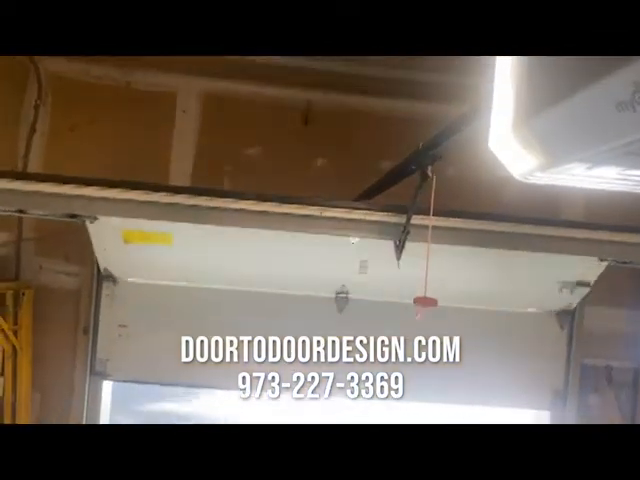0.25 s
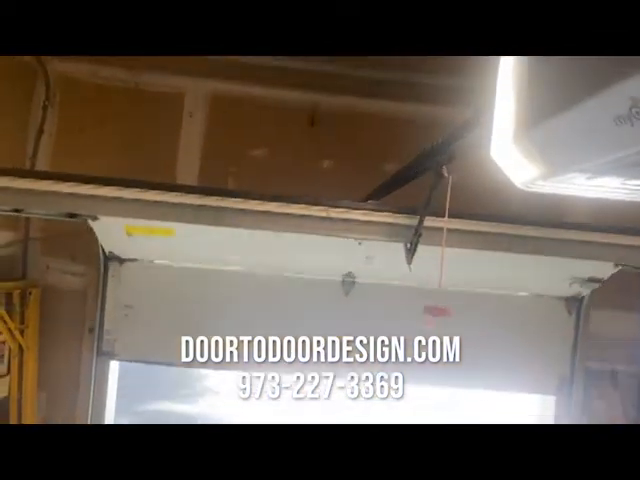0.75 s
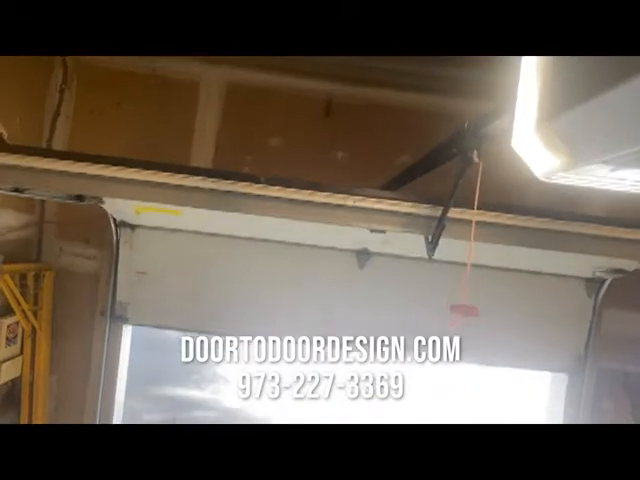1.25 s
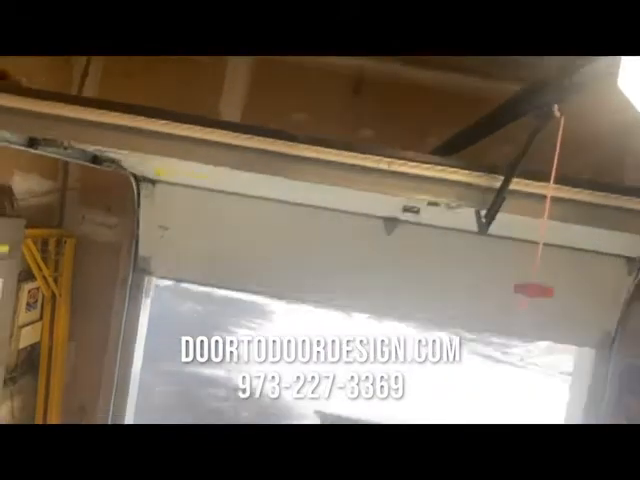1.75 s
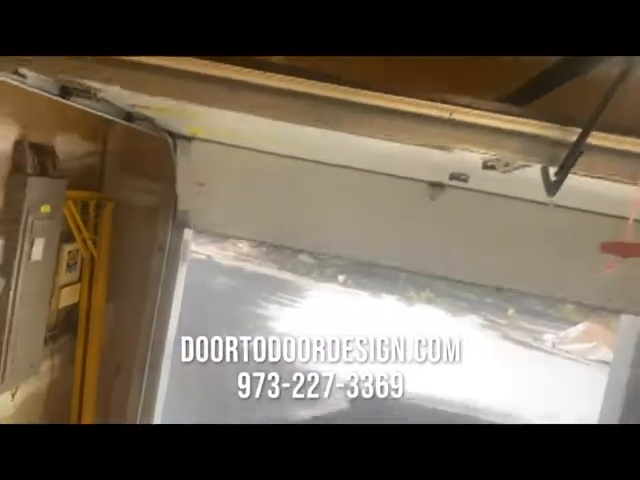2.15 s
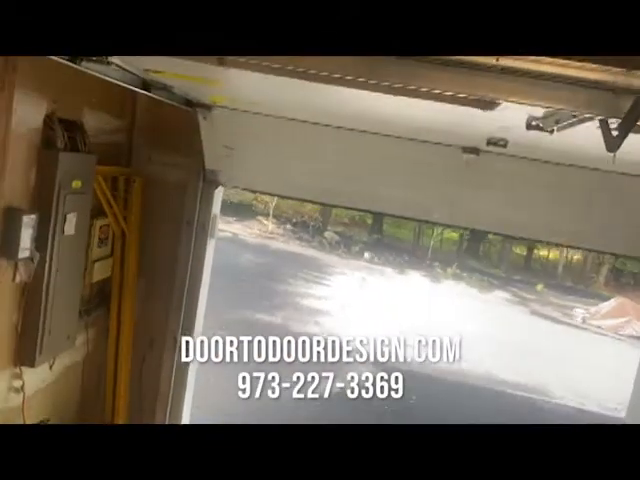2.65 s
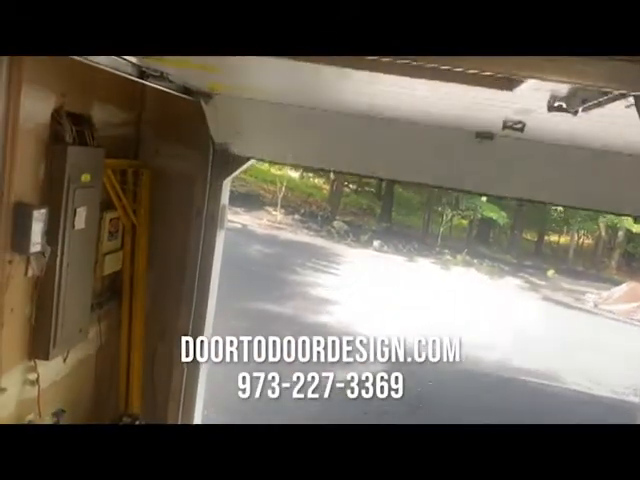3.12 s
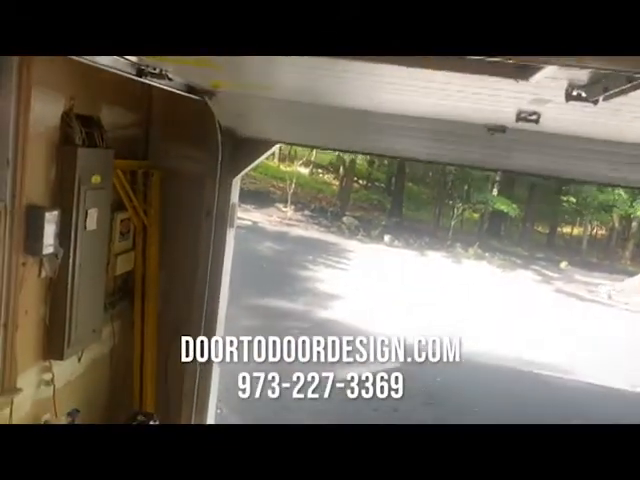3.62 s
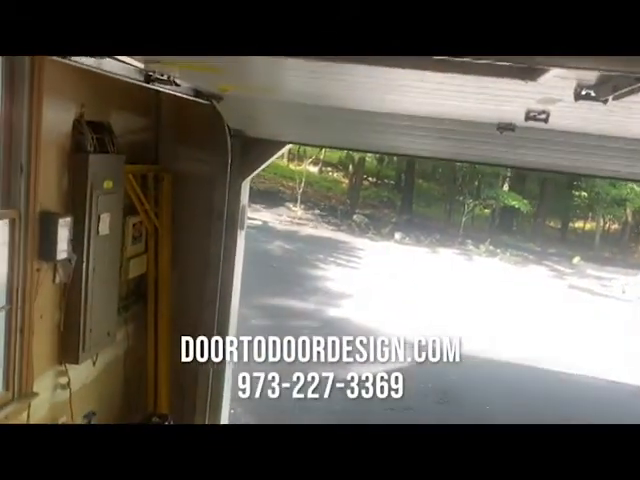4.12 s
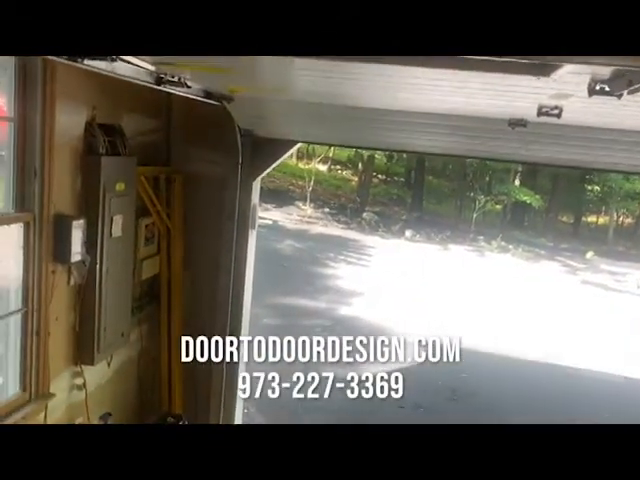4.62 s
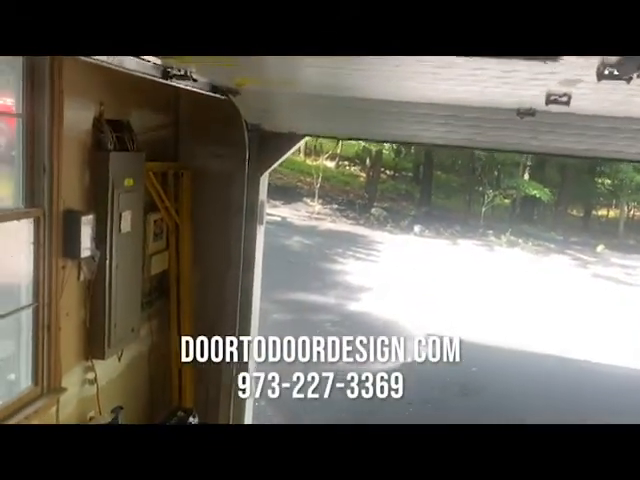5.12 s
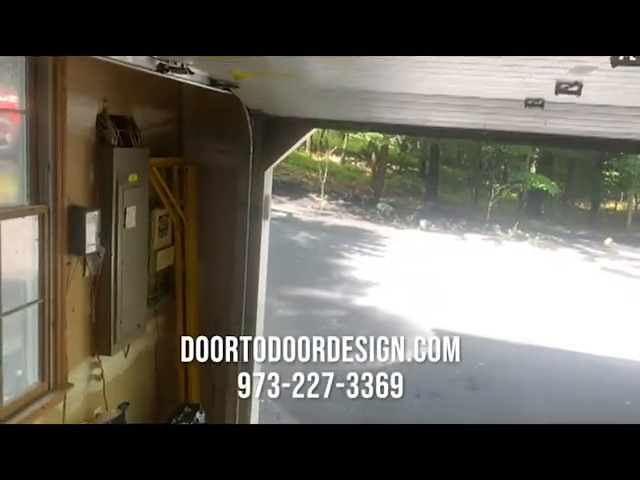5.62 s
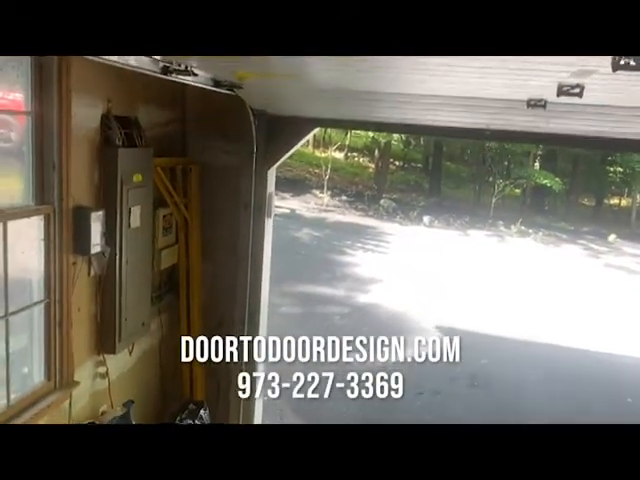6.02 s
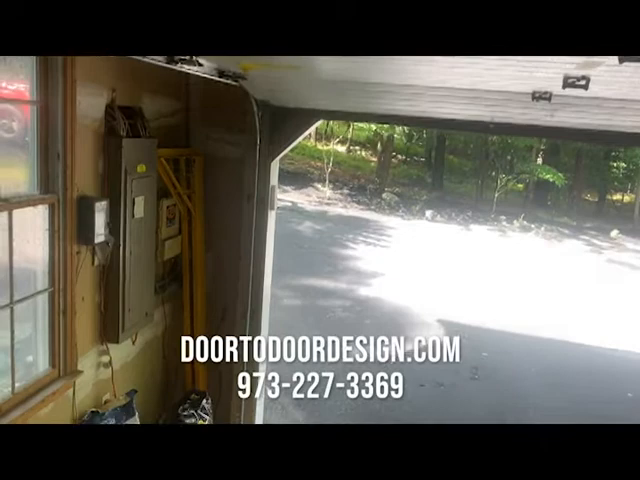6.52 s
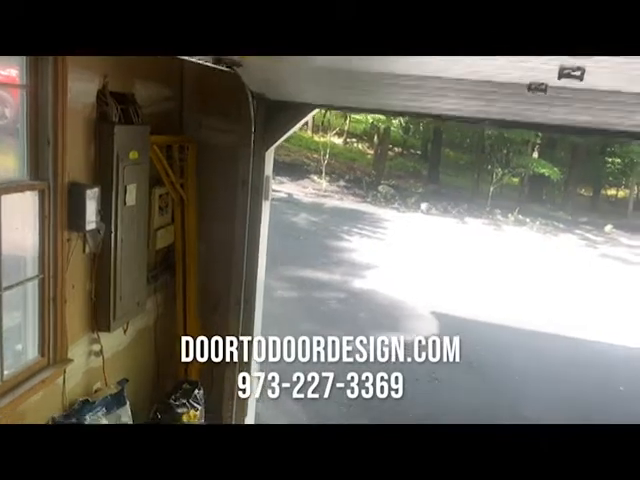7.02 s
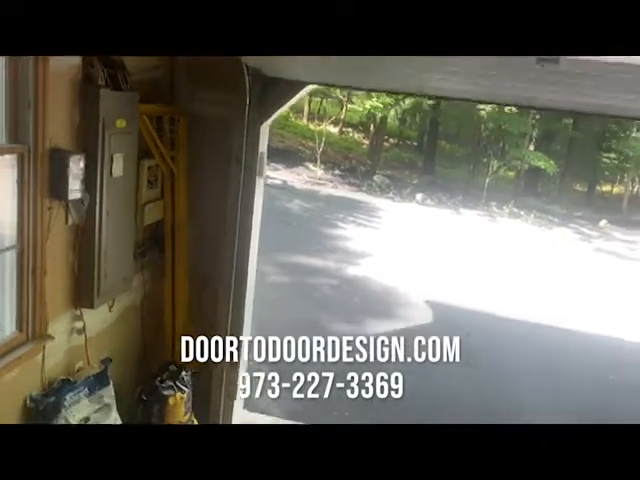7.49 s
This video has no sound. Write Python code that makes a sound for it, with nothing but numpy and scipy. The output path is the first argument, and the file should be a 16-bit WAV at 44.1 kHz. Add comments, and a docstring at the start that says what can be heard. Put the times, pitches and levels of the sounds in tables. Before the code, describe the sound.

Inside a reverberant garage, an electric opener drones and buzzes while its chain clacks, rollers rumble and sheet-metal panels rattle. After more than three seconds a relay clicks, the motor dies and the door knocks to rest. A quiet gap follows, then two separate clicks each set off much louder bangs, hollow knocks and low panel booms. Close, wide stereo pickup.

```python
"""An electric opener hauls a sectional door up in a garage: shaft-driven tones, mains hum and a pulsed buzz,
chain slaps, and noise for rumbling rollers, clattering sheet metal and rattling hinges.
The motor cuts out with a relay click and the door runs to a stop. Twice more a relay clicks and the sections
jerk, knock and bang against their steel hardware: noise bursts and decaying modes with a reverberant tail.
During the run and around the jerks the panels swell into booms of low resonant noise; quiet air lies under all."""
import sys
import numpy as np
from scipy import signal
from scipy.fft import rfft, irfft, next_fast_len
from scipy.io import wavfile
from scipy.ndimage import uniform_filter1d, map_coordinates

SR = 44100
rng = np.random.default_rng(int(sys.argv[2]) if len(sys.argv) > 2 else 0)


def int16_out(signal):
    """Quantize to a 16-bit WAV file."""
    q = np.round(np.clip(np.atleast_2d(signal).T, -1, 1) * 32767)
    wavfile.write(sys.argv[1], SR, q.astype(np.int16))


N = 341775

MOTOR_OFF_S = 3.37
SHAFT_HZ, MAINS_HZ = 29.25, 60
# load on the drive, the reference for its drone and the rollers' rumble: [time_s, level_db]
LOAD = [(0.0, -35), (0.12, -35), (2.46, -37), (2.64, -32), (2.69, -36.5), (3.11, -33), (3.32, -33.5)]


def amp(db):
    """Decibels to a linear factor."""
    return 10 ** (np.asarray(db) / 20)


def unit(x):
    """Scale to an rms of 1 over all channels."""
    return x / np.sqrt(np.mean(x ** 2) + 1e-20)


def clock(size=N):
    """Time of each sample in seconds."""
    return np.arange(size) / SR


def along(points, hz):
    """Interpolate (Hz, value) points on a log frequency axis."""
    f, v = np.transpose(points)
    return np.interp(np.log(hz + 1), np.log(f + 1), v)


def curves(rows):
    """One value per sample for each column after the time."""
    s, *cols = np.transpose(rows)
    return [np.interp(clock(), s, c) for c in cols]


def wobble(rate):
    """A smooth random curve with rate knots a second."""
    knots = rng.standard_normal(int(N * rate / SR) + 4)
    return map_coordinates(knots, [clock() * rate])


def filtered(x, response):
    """Shape the spectrum of x by a response of frequency."""
    n = x.shape[-1]
    m = next_fast_len(n + 8192)
    return irfft(rfft(x, m) * response(np.fft.rfftfreq(m, 1 / SR)), m)[..., :n]


def spread(hz):
    """Angle between mid (0) and side (pi / 2); in the treble the channels swing in and out of phase."""
    # side level against mid, before the treble swing: [pitch_hz, side_minus_mid_db]
    side_balance = [(60, -26.5), (110, -14), (200, -13), (380, -4), (700, -2.5), (1300, 1.5), (2400, -0.5),
                    (4400, -3.5), (8000, -1)]
    swing = np.cos(2 * np.pi * (hz - 7050) / 4140) * np.interp(hz, [5000, 9000], [0, 1])
    return np.arctan(amp(along(side_balance, hz))) - 0.83 * swing


def diffuse(response, size=N):
    """Stereo noise of rms 1, its width set band by band."""
    def mid_side(hz):
        angle = spread(hz)
        return response(hz) * np.array([np.cos(angle), np.sin(angle)])

    mid, side = filtered(rng.standard_normal((2, size)), mid_side)
    return unit(np.array([mid + side, mid - side]))


def noise(colour, size=N):
    """Diffuse noise with a (Hz, dB) colour."""
    return diffuse(lambda hz: amp(along(colour, hz)), size)


def sheet_noise(colour, lift, ripple_db, size=N):
    """Noise ringing in thin steel: a few strong resonances among many small ones."""
    # resonances of sheet steel and track, scaled by lift: [centre_hz, width_hz, full_lift_db]
    sheet = [(844, 61, 7), (965, 14, 4), (1059, 76, 2), (1480, 23, 4.5), (2500, 110, 0.5), (2690, 37, 9),
             (3270, 180, 3.5), (3630, 31, 1), (4320, 180, -3)]

    def response(hz):
        strong = sum(db / (1 + (2 * (hz - c) / w) ** 2) for c, w, db in sheet)
        small = map_coordinates(rng.standard_normal(SR // 8), [hz / 55], mode="nearest")
        small = small * hz / (hz + 600)  # the ripple grows towards the treble
        return amp(along(colour, hz) + lift * strong + ripple_db * small)

    return diffuse(response, size)


def tone(phase, hz):
    """A stereo sine of rms 1; the two channels are set apart in phase."""
    apart = spread(hz) * rng.choice([-1, 1])
    start = rng.uniform(0, 2 * np.pi)
    return np.sqrt(2) * np.sin(phase + start + np.array([[apart], [-apart]]))


def ring(modes, centre_hz, octaves, loose, detune):
    """Modes near centre_hz ring out, a little retuned each time; loose joints make their phases wander."""
    t = clock(SR // 2)
    out = np.zeros((2, len(t)))
    for hz, db, t60 in modes:
        reach = 1 / (1 + (np.log2(hz / centre_hz) / octaves) ** 2)
        tuned_hz = hz * (1 + detune * rng.normal())
        wander = loose * np.cumsum(rng.standard_normal(len(t))) / np.sqrt(SR)
        level = reach * amp(db + rng.normal(0, 0.86))
        decay = np.exp(-np.log(1000) * t / t60)
        out += level * decay * tone(2 * np.pi * tuned_hz * t + wander, hz)
    return out


def burst(colour, t60, room_db, attack, snap=0):
    """A short contact in steel and the garage's answer, which dies at its own rate in each band."""
    # reverberation of the garage: [pitch_hz, t60_s]
    garage = [(100, 0.73), (500, 1.22), (2000, 0.93), (4000, 0.88), (8000, 0.5), (15000, 0.5)]
    t = clock(SR)
    ringing = sheet_noise(colour, lift=0.43, ripple_db=5.0, size=SR)
    hz, frames, z = signal.stft(ringing[:, ::-1], SR, nperseg=256)
    fade = amp(-60 * frames / along(garage, hz)[:, None])
    tail = signal.istft(z * fade, SR, nperseg=256)[1][:, :SR]
    direct = ringing * np.exp(-np.log(1000) * t / t60) * (1 - np.exp(-t / attack))
    first_touch = 1 + snap * np.exp(-t / 0.00088)  # steel on steel starts with a hard crack
    return direct * first_touch + amp(room_db) * tail * (1 - np.exp(-t / 0.011))


def sharpen(x, db):
    """Lift the top octave for harder contacts, or lower it for softer ones."""
    return filtered(x, lambda hz: amp(db / (1 + (8500 / (hz + 1)) ** 8)))


def shifting(x, patchy_db):
    """Loose parts shift, so their resonances swell and break off in patches of time and pitch."""
    patch_hz, patch_s = 330, 0.035
    hz, t, z = signal.stft(x, SR, nperseg=512)
    where = np.meshgrid(hz / patch_hz, t / patch_s, indexing="ij")
    field = map_coordinates(rng.standard_normal((128, 512)), where, order=3, mode="wrap")
    return unit(signal.istft(z * amp(patchy_db * field), SR, nperseg=512)[1][:, :x.shape[1]])


def chatter(rate, spread_db, life, share):
    """Envelope of many small random contacts over a steady reverberant wash."""
    hits = (rng.random(N) < rate / SR) * amp(spread_db * np.minimum(rng.exponential(size=N), 3))
    power = signal.lfilter([1], [1, -np.exp(-2 / (life * SR))], hits ** 2)
    share = np.clip(share, 0, 1)
    return uniform_filter1d(np.sqrt(1 - share + share * power / power.mean()), size=40)


def swell(s, rise_s, hold_s, fall_db_per_s):
    """Attack from s seconds on, hold, then a steady fall in dB."""
    t = clock() - s
    return np.clip(t / rise_s, 0, 1) * amp(-fall_db_per_s * np.maximum(t - rise_s - hold_s, 0))


def add(track, s, sound):
    """Mix a sound in at s seconds."""
    part = track[:, round(s * SR):][:, :sound.shape[1]]
    part += sound[:, :part.shape[1]]


def motor():
    """The motor: its field gives hum, whine and buzz; its shaft shakes the drive into a drone."""
    t = clock()
    since_off = np.maximum(t - MOTOR_OFF_S, 0)
    turns = SHAFT_HZ * t + 0.013 * wobble(3.09)  # the shaft runs a little unevenly
    since_peak = (t * 2 * MAINS_HZ) % 1 / (2 * MAINS_HZ)  # s, the field peaks twice per mains cycle
    drone = shaft_drone(turns)
    field = hum() + whine(turns) + buzz(since_peak) + sing(since_peak)
    return drone * np.exp(-since_off / 0.08) + field * np.exp(-since_off / 0.024)


def shaft_drone(turns):
    """The turning shaft shakes the drive at multiples of its speed, each line wavering by itself."""
    # drive vibration, levels relative to the drone: [shaft_multiple, start_db, halfway_db, motor_off_db]
    orders = [(2, -9.5, -14, -9), (5.997, -12.5, -9.5, -14), (7, -11.5, -9, -8.5), (9.11, -7.5, -9.5, -19),
              (9.97, -5, -5, -7.5), (11.93, -5.5, -6, -10), (12.9, -14, -17.5, -21),
              (14.1, -17, -13.5, -14.5), (16.05, -18, -16.5, -14.5), (20.28, -21, -26, -33),
              (21.75, -17, -22, -19), (23.04, -19, -16, -16), (25.25, -28, -18, -17),
              (28.14, -23, -20, -19), (31.75, -27, -20, -16.5), (36, -29, -12, -24),
              (36.7, -19, -15.5, -26), (39.1, -16, -25, -25), (40.1, -23, -22, -23)]
    # mean level of the drive's strongest line: [time_s, level_db]
    main_line = [(0, -47), (.14, -41.5), (.27, -48), (.5, -38.5), (.75, -42), (.95, -38), (1.14, -45.5),
                 (1.38, -37), (1.7, -52), (2.2, -51), (2.55, -46), (2.85, -38), (3.0, -50), (3.26, -50),
                 (3.36, -43)]
    main_order, drone_re_load_db = 11, -5.5
    load_db, = curves(LOAD)
    main_db, = curves(main_line)

    def line(k):
        phase = 2 * np.pi * k * turns + 0.34 * wobble(12)
        return amp(2.15 * wobble(5.0)) * tone(phase, k * SHAFT_HZ)

    drone = amp(main_db) * line(main_order)
    for k, *levels_db in orders:
        level_db = np.interp(clock(), [0, MOTOR_OFF_S / 2, MOTOR_OFF_S], levels_db)
        drone += amp(load_db + drone_re_load_db + level_db) * line(k)
    return drone


def hum():
    """The magnetic field hums on even mains harmonics."""
    # mean levels, around which each harmonic wavers: [pitch_hz, level_db]
    harmonics = [(120, -52.5), (240, -43), (1680, -65)]
    return sum(amp(db + wobble(3.5)) * tone(2 * np.pi * hz * clock(), hz) for hz, db in harmonics)


def whine(turns):
    """A magnetic whine; each turn of the rotor sways it and gives it sidebands."""
    # level before trim and waver: [time_s, level_db]
    whine_level = [(0.0, -73), (0.03, -57), (0.53, -56), (1.04, -62.5), (1.9, -59), (2.4, -51), (3.05, -51),
                   (3.33, -54)]
    whine_hz = 30 * MAINS_HZ
    level_db, = curves(whine_level)
    phase = 2 * np.pi * whine_hz * clock() + 0.25 * wobble(24.9)
    sway = 1 + 0.15 * np.sin(2 * np.pi * turns)
    return amp(level_db - 1.5 + 1.2 * wobble(14)) * tone(phase, whine_hz) * sway


def buzz(since_peak):
    """Bright noise pulses with each peak of the field and sinks as the door rises."""
    # colour of the buzz: [pitch_hz, level_db]
    buzz_colour = [(3000, 0), (6000, -6), (7600, -6), (9000, -0.5), (10500, -0.5), (11500, 2.5),
                   (11750, 1.5), (12050, 2), (13000, 3), (14000, -6), (15800, -9.5)]
    halfway_db, fade_db_per_s = -51.5, 2
    level_db = halfway_db - fade_db_per_s * (clock() - MOTOR_OFF_S / 2)
    pulses = unit(1 + 1.1 * np.exp(-since_peak / 0.0022))
    return amp(level_db) * sheet_noise(buzz_colour, lift=0, ripple_db=-0.5) * pulses


def sing(since_peak):
    """A thin high ring struck by each pulse of the buzz."""
    # pitch glide, and level at each strike: [time_s, pitch_hz, level_db]
    sing_path = [(0, 12040, -63), (1.1, 12500, -63), (1.6, 11800, -54), (2.0, 11860, -52.5),
                 (3.37, 11850, -55)]
    decay_s = 0.0038
    pitch_hz, level_db = curves(sing_path)
    phase = 2 * np.pi * np.cumsum(pitch_hz) / SR + 0.45 * wobble(120)
    return amp(level_db) * np.exp(-since_peak / decay_s) * tone(phase, pitch_hz.mean())


def chain():
    """While the motor pulls, links slap the rail: short uneven clacks, each with its own colour."""
    link_count, level_db, level_spread_db = 44, -47.5, 1
    middle_hz, reach_octaves = 1390, 0.61
    out = np.zeros((2, N))
    t = clock(SR // 8)
    fade = np.exp(-t / 0.0067) + 0.2 * np.exp(-t / 0.038)
    for k, (late, strength, pitch) in enumerate(rng.standard_normal((link_count, 3))):
        centre_hz = middle_hz * 2 ** (reach_octaves * np.tanh(pitch))
        clack = diffuse(lambda hz: hz / centre_hz / (1 + (hz / centre_hz) ** 4), len(t))
        slap_s = abs(k + 0.5 * late) * MOTOR_OFF_S / link_count
        add(out, slap_s, amp(level_db + level_spread_db * strength) * fade * clack)
    return out


def travelling():
    """1 while the door runs, dying away once it comes to rest."""
    stop_s, fall_db_per_s = 3.687, 96
    return amp(-fall_db_per_s * np.maximum(clock() - stop_s, 0))


def travel():
    """The door rolls up the track; small bumps swell clatter and rattle together."""
    # reference for hinge rattle and clatter: [time_s, level_db]
    looseness = [(0.0, -47), (0.16, -46), (0.57, -47.5), (0.71, -49.5), (1.07, -48), (1.32, -52),
                 (1.53, -49.5), (1.65, -49.5), (2.91, -48.5), (3.31, -47.5), (3.43, -48), (3.6, -51.5)]
    # colour of the rolling rumble: [pitch_hz, level_db_per_hz]
    rolling = [(70, -10.5), (100, -1), (150, -0.5), (220, 1.5), (290, -3), (340, -1), (420, -7.5),
               (600, -20.5), (1200, -65.5)]
    roll_re_load_db, clatter_re_loose_db, rattle_re_loose_db = -4, 5.5, 1
    clatter_follows = 0.67  # share of the rattle's swells that the sheet metal follows
    load_db, = curves(LOAD)
    loose_db, = curves(looseness)
    bumps_db = 0.61 * wobble(14)
    mean_db = loose_db.mean()
    clatter_db = clatter_re_loose_db + mean_db + clatter_follows * (loose_db - mean_db)
    rumbling = amp(load_db + roll_re_load_db)
    clattering = amp(clatter_db + bumps_db)
    rattling = amp(loose_db + rattle_re_loose_db + bumps_db)
    return travelling() * door(rumbling, clattering, rattling, rolling, lift=0.11, sharp_db=5.5)


def door(rumbling, clattering, rattling, colour, lift, sharp_db):
    """Rollers rumble, sheet metal clatters and loose hinges rattle, each under its own envelope."""
    # colours of sheet metal and hinges: [pitch_hz, level_db]
    clatter_colour = [(250, -40), (420, -5.5), (520, -3), (620, -0.5), (850, -2), (1100, -2), (1400, -6.5),
                      (1650, -11.5), (1900, -12), (2600, -37), (5000, -70)]
    rattle_colour = [(900, -4), (1700, 3.5), (2500, 2.5), (3500, -3.5), (4500, -5.5), (5600, -9),
                     (7600, -9.5), (9000, -13), (11000, -13.5), (14000, -17.5), (15800, -33)]
    rumble = noise(colour) * chatter(rate=64, spread_db=5.0, life=0.02, share=0.25)
    metal = shifting(sheet_noise(clatter_colour, lift, ripple_db=3.5), patchy_db=1.5)
    clatter = metal * chatter(rate=110, spread_db=6.5, life=0.021, share=0.54)
    hinges = shifting(sheet_noise(rattle_colour, lift, ripple_db=2.5), patchy_db=2)
    rattle = sharpen(hinges, sharp_db) * chatter(rate=130, spread_db=4.0, life=0.02, share=0.5)
    return rumbling * rumble + clattering * clatter + rattling * rattle


def scrapes():
    """A roller rubs its track for a moment and rasps in one band, catching and slipping."""
    # strokes, half-width as a share of the centre: [start_s, length_s, centre_hz, half_width, peak_db]
    strokes = [(0.13, 0.13, 950, 0.33, -41), (0.364, 0.13, 1590, .16, -41.5),
               (0.461, 0.19, 1470, 0.5, -39.5), (.47, 0.076, 3380, .15, -46), (1.02, 0.3, 2260, 0.029, -50),
               (1.485, .07, 3500, .12, -52.5), (1.57, .07, 3920, 0.19, -49.5),
               (1.67, 0.096, 3300, 0.51, -47.5), (1.855, .07, 2130, .05, -49),
               (1.865, 0.047, 4600, .08, -46), (2.09, 0.11, 1950, .07, -48), (2.202, 0.15, 2560, 0.04, -51),
               (3.0, 0.059, 1590, .1, -46), (5.152, 0.083, 855, 0.076, -32),
               (6.831, 0.13, 1020, 0.3, -36.5), (6.783, 0.14, 2450, 0.067, -40),
               (6.848, 0.13, 4470, .08, -44), (7.175, .04, 5500, .07, -42), (7.426, 0.064, 3000, 0.1, -43),
               (7.422, 0.11, 1020, 0.44, -36.5)]
    out = np.zeros((2, N))
    for s, length, centre_hz, width, db in strokes:
        stroke = np.hanning(round(length * SR))
        rasp = diffuse(lambda hz: 1 / (1 + ((hz - centre_hz) / (width * centre_hz)) ** 2), len(stroke))
        add(out, s, amp(db) * stroke * rasp)
    return out * chatter(rate=130, spread_db=1.5, life=0.01, share=0.38)


def groan():
    """A section bending round the curve of the track shudders at one low pitch, swelling and fading."""
    centre_s, width_s, peak_db, groan_hz = 2.63, 0.075, -34.5, 119
    bend = 1 / (1 + ((clock() - centre_s) / width_s) ** 4)
    return amp(peak_db) * bend * tone(2 * np.pi * groan_hz * clock() + 0.31 * wobble(19), groan_hz)


def jolts():
    """Each jolt shakes the whole door for a moment; the energy of overlapping jolts adds up."""
    # jolts: [start_s, hold_s, rumble_db, clatter_db, rattle_db]
    jolt_table = [(3.513, 0.066, -40, -41.5, -73), (3.647, 0.0091, -40, -40, -66),
                  (3.703, 0.0085, -39, -41.5, -55), (4.128, .01, -64, -76, -84),
                  (5.094, 0.05, -35.5, -33.5, -42), (5.158, 0.056, -30, -33, -39),
                  (5.34, 0.011, -27.5, -34, -38), (5.457, 0.024, -33, -41, -46),
                  (5.668, .02, -39, -50, -65), (5.885, .005, -44.5, -54.5, -70),
                  (6.08, 0.028, -47.5, -69, -77), (6.284, 0.13, -53, -74, -81), (6.771, 0.1, -30, -36, -39),
                  (6.988, 0.028, -29, -31, -37), (7.16, .02, -32, -37, -43), (7.417, 0.1, -35, -41, -45.5)]
    # fall of rumble, clatter and rattle in turn: [fall_db_per_s]
    falls = [63, 108, 66]
    # colour of the lurching rumble: [pitch_hz, level_db_per_hz]
    lurching = [(70, -19), (105, 3), (140, -2), (205, 1), (255, -5.5), (335, -0.5), (420, -9.5),
                (600, -15.5), (1200, -69.5)]
    rise_s = 0.029
    power = np.zeros((3, N))
    for s, hold_s, *levels_db in jolt_table:
        for part, (db, fall) in enumerate(zip(levels_db, falls)):
            power[part] += (amp(db) * swell(s, rise_s, hold_s, fall)) ** 2
    return door(*np.sqrt(power), lurching, lift=0.62, sharp_db=-7.5)


def knocks():
    """A section knocks against its neighbour: a short hollow swing, then a weaker ring."""
    # knocks, level before trim: [start_s, level_db, ring_centre_hz]
    knock_table = [(.148, -32, 338), (.225, -37.5, 950), (.538, -33, 1340), (1.877, -39, 1100),
                   (1.993, -40, 980), (2.417, -38, 650), (2.917, -47, 1100), (3.340, -31, 316),
                   (3.397, -33, 339), (3.545, -40, 1150), (3.560, -33, 200), (3.605, -35, 200),
                   (3.661, -30, 1000), (3.674, -32.5, 660), (3.684, -32, 340), (3.738, -36, 1030),
                   (3.742, -28.5, 270), (3.764, -28, 225), (3.772, -38, 700), (3.797, -33.5, 560),
                   (5.130, -26, 301), (5.174, -26, 900), (5.203, -26, 1060), (5.218, -28.5, 500),
                   (5.240, -27.5, 980), (5.258, -21.5, 175), (5.305, -31, 450), (5.388, -21.5, 320),
                   (5.402, -27.5, 450), (5.480, -31.5, 850), (5.503, -29, 450), (5.620, -37.5, 450),
                   (5.661, -38.5, 1035), (5.907, -44, 330), (6.552, -49.5, 281), (6.803, -29.5, 323),
                   (6.811, -24, 1000), (6.834, -23, 875), (6.864, -30, 1250), (6.880, -29.5, 760),
                   (6.918, -34, 1080), (6.990, -31, 820), (7.022, -23.5, 362), (7.028, -29.5, 1400),
                   (7.052, -30.5, 1050), (7.070, -31, 230), (7.132, -39, 158.7), (7.203, -27, 350),
                   (7.399, -33.5, 1050), (7.432, -32, 900), (7.491, -40, 280), (7.585, -39, 1500)]
    # modes of a door section, t60 of the late ring: [pitch_hz, level_db, t60_s]
    section = [(173, 0, 0.35), (226.6, 2, .4), (290.6, -1.5, 0.427), (337.2, 1, 0.46), (376.5, -2, 0.24),
               (462, -3, 0.68), (561, -7, .4), (657, -2.5, 0.66), (706, -7.5, .5), (838, 0, 0.45),
               (942, -1.5, 0.41), (1076, -1, 0.37), (1207, -9, 0.32), (1476, -1.5, .55), (1616, -2.5, 0.49)]
    rise_s, first_t60_s, late_db = 0.0027, 0.09, -10
    out = np.zeros((2, N))
    t = clock(SR // 2)
    fall = np.exp(-np.log(1000) * t / first_t60_s) + amp(late_db)
    shape = (1 - np.exp(-t / rise_s)) * fall
    for s, db, centre_hz in knock_table:
        hollow = ring(section, centre_hz, octaves=0.36, loose=6.5, detune=0.007)
        add(out, s, amp(db - 3.5) * shape * hollow)
    return out


def blows():
    """Rollers, hinges and arm clack and thud; where a blow lands decides which steel modes ring."""
    # blows, clack before trim: [start_s, clack_db, thud_db, ring_centre_hz, top_octave_lift_db]
    blow_table = [(.055, -49, -44, 3400, -1), (0.132, -38, -54, 7400, 8), (.215, -42, -34.5, 2630, -4),
                  (0.379, -41.5, -49, 4400, 9), (.483, -38.5, -28.5, 4320, 9), (.540, -44, -34, 2650, -2),
                  (.916, -43.5, -37, 4350, -2), (1.128, -46, -55, 7460, 16), (1.160, -44, -48, 2300, -1),
                  (1.52, -46, -42, 2630, -10), (1.879, -41, -49, 4600, -2), (1.996, -46, -38.5, 4400, -15),
                  (2.113, -42, -35, 2700, 5), (2.359, -43.5, -47, 7400, -9), (2.802, -41.5, -33, 2700, 0),
                  (3.030, -48, -41, 3400, -9), (3.229, -54, -47, 2600, -8), (3.55, -44, -44, 7400, 13),
                  (3.663, -40.5, -29, 7500, 16.5), (3.737, -43, -32, 7600, 11.5),
                  (5.079, -47, -47, 4500, -4), (5.110, -45, -34, 5600, 0), (5.121, -39, -43, 10600, 16),
                  (5.139, -43.5, -38, 10600, 19), (5.168, -35, -27, 10600, 20.5),
                  (5.200, -35, -27, 2560, 16), (5.238, -39.5, -33.5, 2580, 18),
                  (5.366, -33.5, -43, 6980, 9), (5.378, -24, -35, 7230, 9.5),
                  (5.478, -31.5, -32, 4070, -17), (5.662, -48, -35.5, 3440, -28),
                  (5.907, -59.5, -43, 2630, -13), (6.774, -36.5, -46, 7400, 3),
                  (6.793, -33, -40, 3400, -14), (6.801, -31.5, -33, 4400, -1), (6.811, -43, -36, 7400, 0),
                  (6.837, -38, -30, 7400, 7), (6.858, -29, -55, 7900, 3), (6.999, -39.5, -52, 6300, 7),
                  (7.015, -25, -39, 6600, 5), (7.186, -31.5, -35.5, 3710, -10),
                  (7.400, -56, -34, 2700, -12), (7.430, -36.5, -34.5, 3100, -1),
                  (7.465, -37, -42, 3700, -38), (7.627, -44.5, -37, 3490, -42)]
    # colours of clack and thud: [pitch_hz, level_db]
    clack_colour = [(300, 0.5), (1000, 10), (2000, -11), (3300, 3.5), (5500, -1.5), (7600, -2.5),
                    (9000, -3.5), (11000, -11), (14000, -18), (15800, -26)]
    thud_colour = [(60, -19), (180, 0.5), (330, -7), (450, -2.5), (650, -5.5), (950, -6), (1500, -16),
                   (3000, -24), (8000, -60.5)]
    # modes of the steel arm and track: [pitch_hz, level_db, t60_s]
    steel = [(2570, -1.5, 0.24), (2630, 1.5, 0.33), (3170, 6, .15), (3390, 7, 0.22), (3520, 2, .35),
             (3590, 1, 0.32), (4130, -7, 0.2), (4490, 3, 0.16), (5700, 3.5, 0.22), (6300, 0, 0.18),
             (6892, -4.5, 0.26), (7340, 3, 0.17), (7760, -7.5, 0.19), (9170, 0, 0.293), (10600, -10, .25),
             (11500, -17, 0.31)]
    # ring relative to the clack of a hard blow; softer blows ring less, in dB per dB
    ring_db, ring_grows, hard_db = -12, 0.13, -24
    out = np.zeros((2, N))
    for s, clack_db, thud_db, centre_hz, sharp_db in blow_table:
        steel_db = clack_db + ring_db + ring_grows * (clack_db - hard_db)
        add(out, s, amp(steel_db) * ring(steel, centre_hz, octaves=0.17, loose=11, detune=0.001))
        clack = burst(clack_colour, t60=0.074, room_db=-11.0, attack=0.00026, snap=0.69)
        add(out, s, amp(clack_db + 1.5) * sharpen(clack, sharp_db))
        add(out, s, amp(thud_db) * burst(thud_colour, t60=0.16, room_db=-11.0, attack=0.0015))
    return out


def panels():
    """The panels sway in their low modes, and now and then boom, during the run and around the jerks."""
    # door panel modes: [centre_hz, width_hz, level_db]
    panel_modes = [(51.3, 3.4, -7), (60.5, 6.2, 6), (87, 9.6, -6.5)]
    # booms: [start_s, hold_s, level_db, fall_db_per_s]
    swings = [(.58, 0.3, -43, 120), (2.515, 0.077, -38.5, 92), (2.794, 0.28, -38.5, 88),
              (3.84, 0.049, -41.5, 112), (5.062, 0.045, -29, 168), (5.39, 0.018, -21.5, 47.5),
              (5.863, 0.045, -34.5, 44.5), (6.272, 0.056, -42.5, 71), (6.745, .03, -28.5, 46),
              (7.04, .03, -27.5, 55), (7.497, .04, -32.5, 38)]
    sway_db, sway_wander_db, rise_s = -44.5, 1.5, 0.03

    def response(f):
        modes = 0
        for k, (c, w, db) in enumerate(panel_modes):
            modes = modes + (-1) ** k * amp(db) * 1j * f * w / (c * c - f * f + 1j * f * w)
        return modes / (1 + (36 / (f + 1)) ** 8) / (1 + (f / 130) ** 4)

    sway = diffuse(response)
    # the swing of the panels is far steadier than noise
    sway = sway / np.sqrt(np.abs(uniform_filter1d(sway[0] ** 2, SR // 12)) + 0.01)
    running = amp(sway_db + sway_wander_db * wobble(12.0)) * travelling()
    booms = sum((amp(db) * swell(s, rise_s, hold_s, fall)) ** 2 for s, hold_s, db, fall in swings)
    return sway * np.sqrt(running ** 2 + booms)


def relay():
    """The contacts snap with a dry, pitched tick, and the motor housing thumps a moment later."""
    # switchings, snap and tick before trim: [start_s, snap_db, tick_db, tick_centre_hz, thump_db]
    switchings = [(3.361, -38, -36.5, 6700, -33), (5.031, -41.5, -34.5, 7000, -36.5),
                  (6.712, -40, -37, 2800, -34)]
    # colours of the snap and of the motor housing: [pitch_hz, level_db]
    snap_colour = [(200, 1), (500, -0.5), (1500, -8.5), (4000, -6.5), (5500, -13), (6800, -9),
                   (9000, -15.5), (12000, -9), (15800, -19.5)]
    housing = [(60, -23), (150, -8), (230, -5.5), (320, 0), (420, -12), (600, -14), (1100, -17.5),
               (1500, -27), (5000, -44.5)]
    # modes of the relay's armature: [pitch_hz, level_db, t60_s]
    armature = [(2750, 0.5, 0.079), (3430, -6, 0.067), (4690, -10, .08), (6660, 0, 0.046), (7460, -8, .048),
                (10910, -5.5, 0.051)]
    thump_delay_s = 0.009
    out = np.zeros((2, N))
    for s, snap_db, tick_db, centre_hz, thump_db in switchings:
        add(out, s, amp(snap_db + 5.0) * burst(snap_colour, t60=0.047, room_db=-12.5, attack=0.00034))
        add(out, s, amp(tick_db - 5.5) * ring(armature, centre_hz, octaves=0.8, loose=30, detune=0.002))
        thump = burst(housing, t60=0.26, room_db=-8, attack=0.0017)
        add(out, s + thump_delay_s, amp(thump_db) * thump)
    return out


def air():
    """Still garage and outdoor air: a quiet hiss over a low rumble that stirs unevenly."""
    # colour of the air: [pitch_hz, level_db_per_hz]
    air_colour = [(15, -60), (25, -24), (42, -7.5), (64, -2), (92, -10), (127, -7), (145, -16.5),
                  (354, -17.5), (476, -26.5), (714, -23), (911, -25), (988, -23.5), (1370, -29),
                  (3160, -33.5), (16000, -63.5)]
    air_db, stir_db, stir_hz = -54, 3, 350
    still = noise(air_colour)
    low = filtered(still, lambda hz: 1 / (1 + (hz / stir_hz) ** 4))
    stirred = low * unit(amp(stir_db * wobble(11)))
    return amp(air_db) * (still - low + stirred)


def scene():
    """Opener, door and the still air of the garage."""
    opener = motor() + chain() + relay()
    moving = travel() + scrapes() + groan() + panels()
    impacts = jolts() + knocks() + blows()
    return opener + moving + impacts + air()


def record(dry):
    """Give the two channels slightly different colours and cut everything above the band limit."""
    # colour difference of the channels: [pitch_hz, left_minus_right_db]
    lean = [(80, 0.5), (200, -2), (380, -2), (700, 0.5), (1300, 0), (2400, 2.5), (4400, 2.5), (8000, 0)]
    top_hz = 15900
    return filtered(dry, lambda hz: amp(np.outer([0.5, -0.5], along(lean, hz))) * (hz < top_hz))


dry = scene()
out = record(dry)
int16_out(out)
```